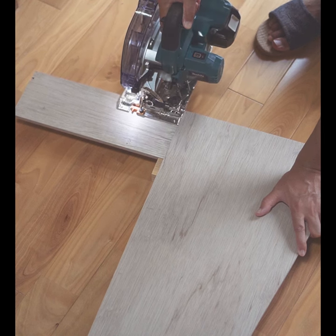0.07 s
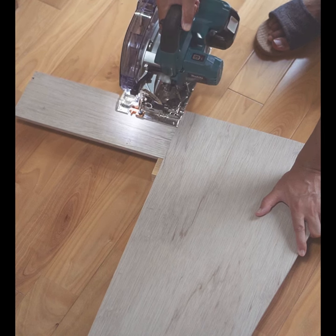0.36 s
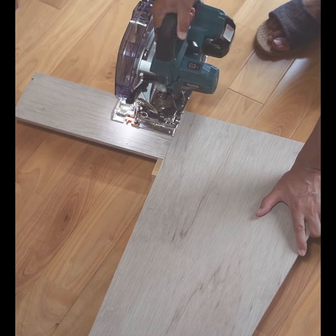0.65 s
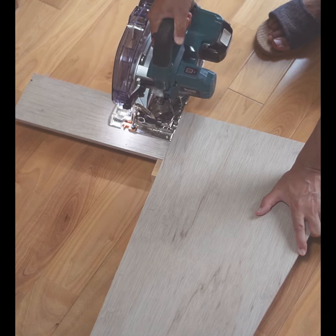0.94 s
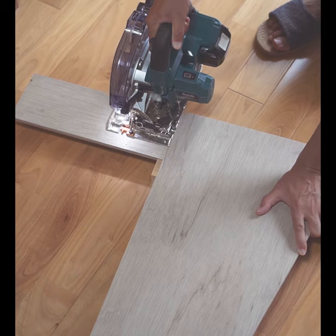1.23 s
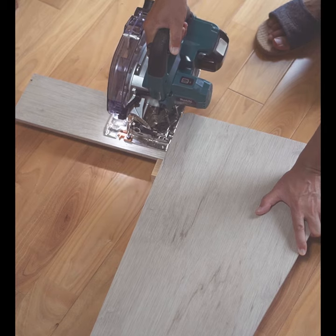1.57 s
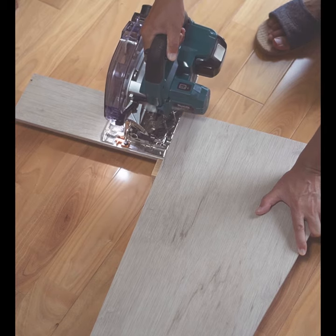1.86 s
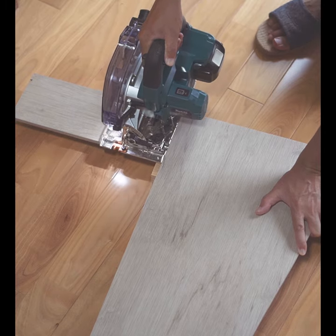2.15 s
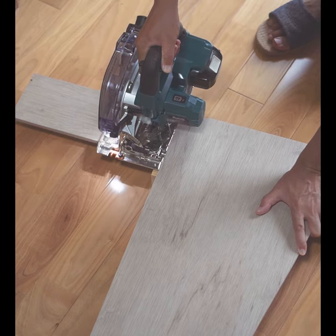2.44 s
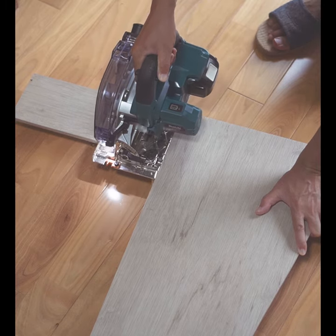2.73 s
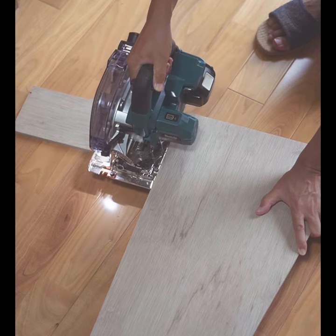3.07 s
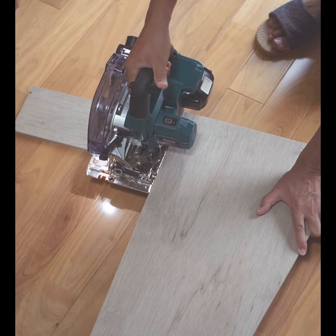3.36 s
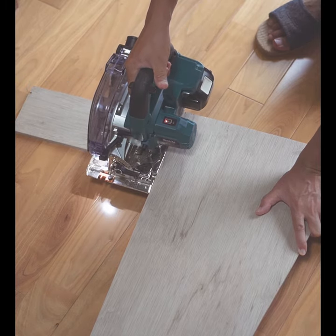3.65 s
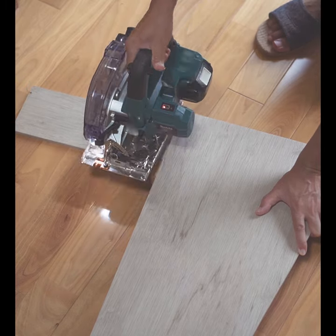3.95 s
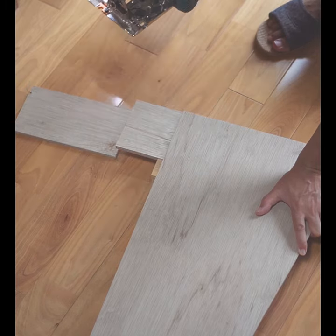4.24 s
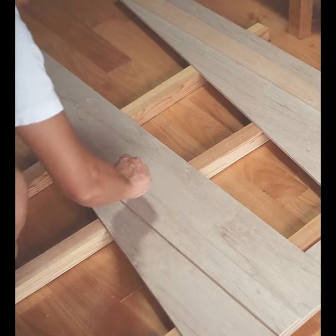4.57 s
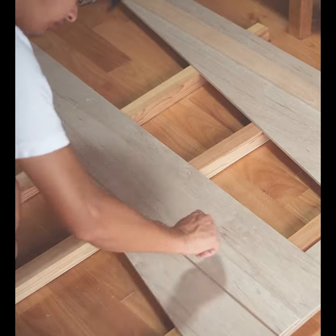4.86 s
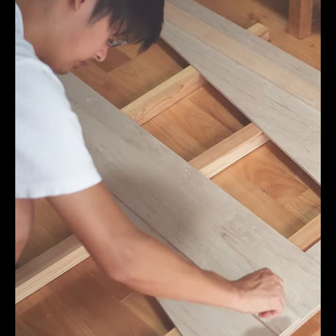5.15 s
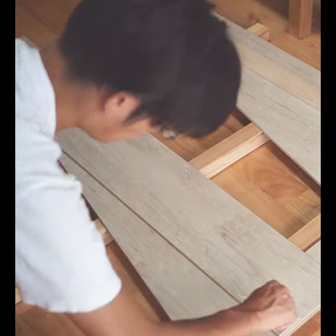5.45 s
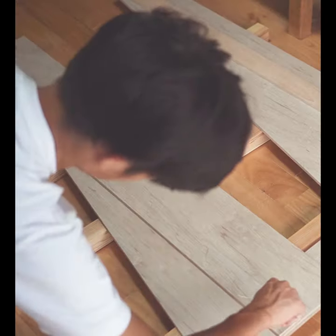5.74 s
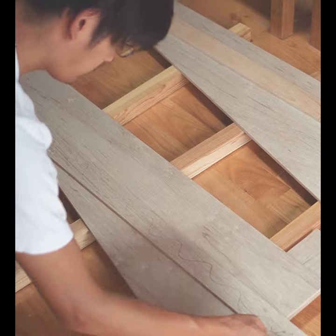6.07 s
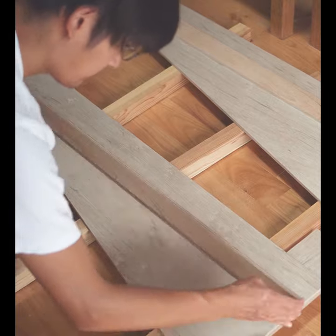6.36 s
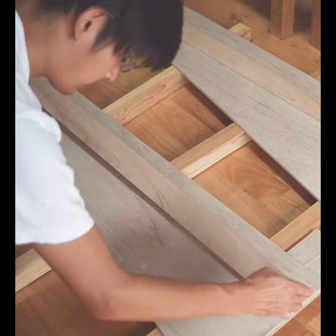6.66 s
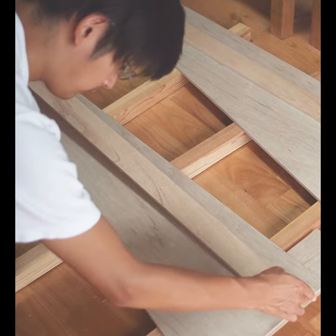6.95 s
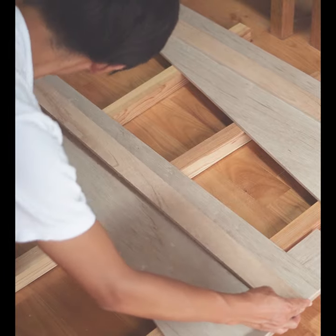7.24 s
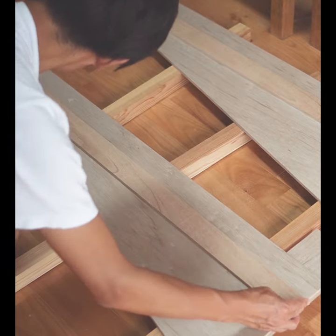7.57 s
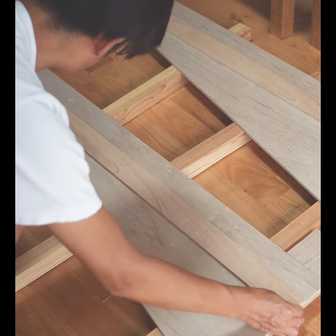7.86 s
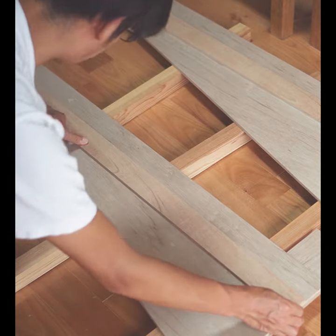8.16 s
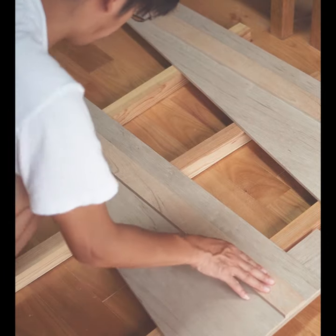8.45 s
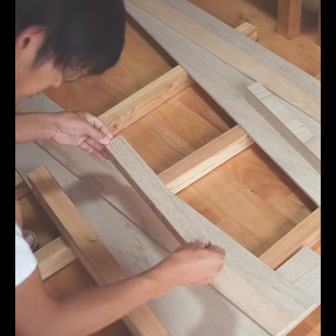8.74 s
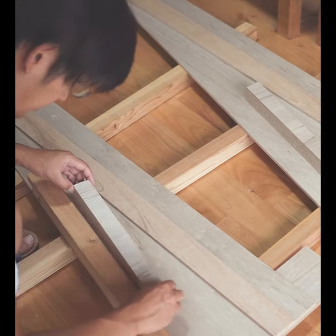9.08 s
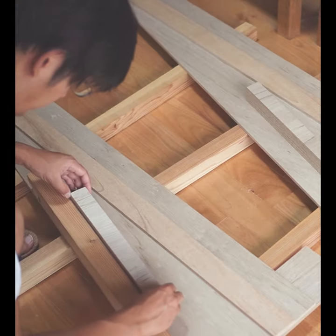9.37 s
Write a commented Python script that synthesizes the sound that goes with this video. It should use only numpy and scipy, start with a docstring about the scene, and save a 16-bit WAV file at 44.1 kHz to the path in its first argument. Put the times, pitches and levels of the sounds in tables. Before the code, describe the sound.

Heard close up indoors, a circular saw starts with metallic clacks and cuts through a plank for about three seconds, its motor dipping while the blade squeals. It stops quickly and the blade guard snaps closed. The background then changes to a steady hiss and low drone, over which a wooden floorboard scrapes, taps and clicks into place, ending with a firm thump and a brief brushing sound.

```python
"""In a quiet room a cordless circular saw clacks and spins up, its fan humming and its gears whining.
The teeth bite a floor plank, the motor sags and friction sets the steel disc squealing; then the saw
brakes and its blade guard snaps shut. Next, in a hissier room, a floorboard is rubbed along its
neighbour, ringing by stick-slip friction, slid into its groove and pressed down on the joists with
a thump. One close microphone hears it all."""
import sys
import numpy as np
from scipy import signal
from scipy.fft import rfft, irfft, next_fast_len
from scipy.io import wavfile

SR = 44100
rng = np.random.default_rng(int(sys.argv[2]) if len(sys.argv) > 2 else 0)


def generate_wav(sig):
    """Save sig (samples, or channels by samples) to the path in sys.argv[1] as 16-bit PCM at SR."""
    pcm = np.round(np.clip(np.atleast_2d(sig).T, -1, 1) * 32767).astype(np.int16)
    wavfile.write(sys.argv[1], SR, pcm)


N = 423801
TIME = np.arange(N) / SR
START_S, BRAKE_AT_S, BRAKE_S, STOP_S = .105, 3.32, .12, 3.36
ENTER_AT_S, ENTER_S, EXIT_AT_S = .68, .39, 3.0  # the blade sinks into the plank, then breaks through

# Spectra of rushing air, the board's body and scraped wood.
# Each row: frequency in Hz, relative density in dB.
AIR_SPECTRUM = [(60, -56), (220, -37), (400, -16.5), (650, -8.5), (1100, 2), (1700, 1), (2300, 5),
                (3000, 4.5), (4500, 1.5), (6100, 2.5), (7500, -2.5), (10000, -3.5), (16000, -12.5)]
BOARD_SPECTRUM = [(120, -38), (260, -22.5), (430, 4), (520, -10), (720, -0.5), (900, -10), (1200, 3),
                  (1480, 5), (1900, -1), (2250, -3), (2900, -16.5), (4600, -43), (8000, -51.5)]
SCRAPE_SPECTRUM = [(1470, -28.5), (2500, -9.5), (3030, -6.5), (3330, -4), (3730, -6), (7950, -9.5),
                   (12900, -15), (15800, -16.5)]
# Scuffs of the board. Each row: centre in seconds, half length in seconds, relative ring and hiss in dB.
BOARD_SCUFFS = [(4.477, .009, -21.5, -45.5), (4.783, .022, -21, -32.5), (4.837, 0.0053, -19.5, -34),
                (4.882, .014, -17, -43.5), (4.933, .016, -22.5, -32), (4.999, .016, -23, -41.5),
                (5.038, 0.01, -18.5, -26.5), (5.091, .014, -11, -29), (5.147, .014, -23.5, -30.5),
                (5.205, .017, -18, -38.5), (6.19, .012, -17, -20.5), (6.229, .023, -14.5, -17),
                (6.356, .011, -18.5, -18.5), (8.012, .016, -31.5, -38), (8.1, .045, -50, -36),
                (8.395, .012, -27, -44)]


def amp(db):
    """Decibels to gain."""
    return 10 ** (np.asarray(db) / 20)


def unit(x):
    """Scale to rms 1."""
    return x / np.sqrt(np.mean(x ** 2) + 1e-20)


def curves(rows):
    """One value per sample for each column after the time."""
    times, *columns = np.transpose(rows)
    return [np.interp(TIME, times, column) for column in columns]


def along(points, hz):
    """(Hz, value) points read on a log axis."""
    freqs, values = np.transpose(points)
    return np.interp(np.log(hz + 1), np.log(freqs + 1), values)


def ramp(s, length):
    """A rise from 0 to 1 that begins at time s."""
    return np.clip((TIME - s) / length, 0, 1)


def swell(s, half):
    """A Gaussian rise and fall around time s."""
    return np.exp(-.5 * np.minimum(((TIME - s) / half) ** 2, 100))


def noise(size=N):
    """White noise."""
    return rng.standard_normal(size)


def wobble(rate):
    """A random curve of rms 1 with rate knots a second."""
    knots = noise(int(N / SR * rate) + 2)
    return unit(np.interp(TIME * rate, np.arange(len(knots)), knots))


def filtered(x, response):
    """x through a frequency response."""
    size = next_fast_len(len(x) + 8192)
    return irfft(rfft(x, size) * response(np.fft.rfftfreq(size, 1 / SR)), size)[:len(x)]


def coloured(x, spectrum):
    """x shaped by a spectrum, at rms 1."""
    return unit(filtered(x, lambda hz: amp(along(spectrum, hz))))


def narrow(hz, width_hz):
    """Noise in one resonance, at rms 1."""
    return unit(filtered(noise(), lambda f: 1 / (1 + ((f - hz) / width_hz) ** 2)))


def add(track, s, sound):
    """Mix a sound in at time s."""
    part = track[max(round(s * SR), 0):][:len(sound)]
    part += sound[:len(part)]


def ring(modes, scatter_db, size=SR):
    """Free decay of (Hz, dB, t60) modes after one blow, their strengths scattered."""
    t = np.arange(size) / SR
    return sum(amp(db + scatter_db * rng.standard_normal() - 60 * t / t60) * np.sin(2 * np.pi * hz * t)
               for hz, db, t60 in modes)


def partials(turns, orders, waver_db, jitter_rad):
    """Harmonics of a shaft's rotation, randomly modulated in level and phase."""
    return sum(amp(db + waver_db * wobble(12)) * np.sqrt(2)
               * np.sin(2 * np.pi * (k * turns + rng.random()) + jitter_rad * wobble(130))
               for k, db in orders)


def reverberant(x, wet_db):
    """Reverberation: a small wooden room adds a short tail whose treble is absorbed first."""
    # Room decay. Each row: frequency in Hz, t60 in seconds.
    walls = [(200, 0.23), (2000, 0.19), (8000, 0.16), (15000, 0.089)]
    hz, t, spectra = signal.stft(noise(SR // 2), SR, nperseg=256)
    tail = signal.istft(spectra * amp(-60 * t / along(walls, hz)[:, None]), SR, nperseg=256)[1]
    delayed_tail = np.pad(tail, (130, 0)) / np.linalg.norm(tail)
    return x + amp(wet_db) * signal.fftconvolve(x, delayed_tail)[:N]


def quiet_room():
    """Stationary noise: a faint broadband floor with a narrowband hum."""
    # Each row: frequency in Hz, relative density in dB.
    floor = [(15, -45.5), (25, -14), (37, -28), (113, -14), (184, -13), (241, -25.5), (276, -10.5),
             (324, -21.5), (1250, -22.5), (7830, -41.5), (12400, -29.5), (13800, -55.5), (15800, -45.5)]
    return amp(-59) * coloured(noise(), floor) + amp(-67) * narrow(179, width_hz=2)


def clacks():
    """Impact noise: gear, brake and guard strike in sharp bursts that also knock on the plank."""
    # Each row: start in seconds, metal level in dB, t60 in seconds, knock level in dB.
    strikes = [(.002, -41, 0.42, -32), (.104, -8.5, .06, -19), (0.13, -11.5, 0.07, -14.5),
               (.15, -13.5, .06, -25), (3.325, -12.5, .1, -29), (3.353, -18.5, .11, -26),
               (4.041, -9.5, 0.079, -28.5), (4.047, -12.5, 0.056, -37), (4.056, -17.5, 0.14, -44),
               (4.077, -21, 0.14, -44)]
    # The metal, and the saw's base on the plank. Each row: frequency in Hz, relative density in dB.
    metal = [(120, -65), (200, -40), (379, -22), (633, -30.5), (774, -17.5), (1360, -19.5), (2150, 1.5),
             (2450, -8), (3160, -3.5), (5680, -14.5), (7470, -13.5), (8180, -19), (15800, -31)]
    base = [(50, -25.5), (140, -2.5), (250, -12.5), (600, -4.5), (1050, 0.5), (1600, -8.5), (5000, -13),
            (16000, -27)]
    out, t = np.zeros(N), TIME[:SR // 2]
    for s, db, t60, knock_db in strikes:
        burst = amp(db) * coloured(noise(len(t)), metal) + amp(knock_db) * coloured(noise(len(t)), base)
        add(out, s, burst * amp(-60 * t / t60) * (1 - np.exp(-t / .001)))
    return reverberant(out, wet_db=-6)


def handling():
    """Friction and impact: base and guard squeak, the guard slides round, the saw bumps the plank."""
    # Each row: centre in seconds, half length in seconds, pitch in Hz, level in dB.
    squeaks = [(.01, 0.043, 10240, -25.5), (0.013, 0.044, 3470, -36.5), (3.662, 0.028, 9300, -61),
               (3.981, 0.014, 1070, -38), (3.992, 0.021, 4270, -47), (4.196, .04, 9440, -62)]
    # Each row: start in seconds, relative level in dB.
    bumps = [(.002, -34), (0.101, -34), (3.40, -43), (3.955, -37), (4.019, -33)]
    out = sum(amp(db) * swell(s, half) * narrow(hz, .055 * hz) for s, half, hz, db in squeaks)
    guard_slide = amp(-38) * swell(4.015, .017) * coloured(noise() * amp(3 * wobble(300)), AIR_SPECTRUM)
    soft_onset = 1 - np.exp(-TIME[:SR] / .012)
    for s, db in bumps:
        add(out, s, amp(db) * ring([(125, 5, .16), (165, -3, .1)], scatter_db=1) * soft_onset)
    return out + guard_slide


def engagement():
    """Fractions from 0 to 1: the blade has entered, its teeth are cutting, its disc is buried."""
    entered = ramp(ENTER_AT_S, ENTER_S)
    cutting = entered * (1 - ramp(EXIT_AT_S, .1))
    return entered, cutting, cutting * ramp(ENTER_AT_S, 1.5)


def load_db(free_db, cutting_db, buried_db):
    """A free-running level plus what cutting and burying the disc each add."""
    _, cutting, buried = engagement()
    return free_db + cutting_db * cutting + buried_db * buried


def fan(motor_turns, speed):
    """Resonance: the housing favours some pitches of the fan, which is muffled over the plank."""
    # Each row: rotation rate in Hz, gain in dB.
    housing = [(300, -45), (500, -33.5), (645, -27), (677, -17), (706, -29.5), (724, -31), (731, -37),
               (742, -26), (751, -29), (765, -24.5), (775, -24.5)]
    # Each row: multiple of the motor speed, relative level in dB.
    orders = [(1, 1.5), (2, -8.5), (3, -8.5)]
    entered, _, _ = engagement()
    level_db = along(housing, speed) - 1.95 * entered
    return amp(level_db) * partials(motor_turns, orders, waver_db=2, jitter_rad=.05)


def gear_whine(motor_turns, speed):
    """Gear meshing: a whine, stronger in run-up and under effort, smeared by backlash when unloaded."""
    # Each row: multiple of the motor speed, relative level in dB.
    orders = [(4, -13.5), (8, 1.5), (9, -2.5), (16, -12)]
    free_hz, full_sag_hz = 783, 60
    entered, cutting, _ = engagement()
    effort = np.clip((free_hz - speed) / full_sag_hz, 0, 1)
    level_db = -34.5 + 6.5 * effort + 7 * (1 - entered)
    slack = .77 * (1 - cutting)
    chatter = (1 + .6 * slack * wobble(600)) / np.hypot(1, .6 * slack)
    whine = partials(motor_turns, orders, waver_db=2.5, jitter_rad=.2 + .67 * slack)
    return amp(level_db) * chatter * whine


def tooth_bite(blade_turns, drive):
    """Periodic impacts: the teeth sound the 21st harmonic, with sidebands as no two bite alike."""
    # The bite, and the screech of the buried teeth.
    # Each row: multiple of the blade speed, relative level in dB.
    bite_orders = [(3, -30), (8, -19.5), (17, -22), (19, -12), (20, -3.5), (21, 1.5), (22, -3), (23, -5),
                   (24, -10), (25, -14.5), (26, -10), (29, -15), (33, -19), (41, -12), (42, -10), (47, -8),
                   (55, -13), (59, -13.5), (60, -7), (71, -14), (83, -15.5), (84, -13.5)]
    screech_orders = [(21, -3)]
    _, _, buried = engagement()
    level_db = load_db(-34, 12.5, -2.7) + 1.3 * wobble(7.03)  # an uneven push makes it surge
    bite = partials(blade_turns, bite_orders, waver_db=3, jitter_rad=.11)
    screech = buried * partials(blade_turns, screech_orders, waver_db=3.5, jitter_rad=.14)
    # the same rasp repeats on every turn: a fine comb of weak lines
    rasp = np.interp(blade_turns % 1, np.arange(256) / 256, noise(256), period=1)
    return amp(level_db) * (drive * (bite + screech) + amp(-13) * coloured(rasp, AIR_SPECTRUM))


def disc_squeal(blade_turns, speed, drive):
    """Friction in the kerf excites high harmonics and one disc mode that keeps its own pitch."""
    # Each row: multiple of the blade speed, relative level in dB.
    orders = [(45, -13), (53, -10.5), (57, -12), (61, -13), (62, -14), (63, 3.5), (64, -14), (65, -22),
              (67, -9.5), (72, -23), (76, -21)]
    best_speed_hz = 728.4  # the disc squeals most readily at this motor speed
    detuning = np.minimum(np.abs(speed - best_speed_hz) / 20, 1)
    harmonics = drive * partials(blade_turns, orders, waver_db=2.5, jitter_rad=.1)
    mode = amp(-.5) * narrow(8220, width_hz=45)
    return amp(load_db(-46, 6.5, 17) - 4.5 * detuning) * (harmonics + mode)


def disc_song():
    """Natural modes: the disc sings before and after the cut, and chirps on entry and mid-cut."""
    before = swell(.5, .3) * (amp(-31) * narrow(2860, 45) + amp(-27) * narrow(2200, 60))
    chirps = swell(.8, .058) * amp(-18) * narrow(2860, 15)
    chirps += swell(2.09, .026) * amp(-24) * narrow(4010, 12)
    after = swell(3.17, .18) * (amp(-21.5) * narrow(2830, 40) + amp(-23) * narrow(8250, 70))
    return before + chirps + after


def air_and_dust(puffs, entry):
    """Modulated noise: the wood muffles the puffs of air; crossing its edges throws more dust."""
    # Each row: frequency in Hz, relative density in dB.
    dust_spectrum = [(2000, -40), (6000, -4.5), (8400, 1), (9500, -1), (11500, -3.5), (13000, -10.5),
                     (16000, -5)]
    air_db = load_db(-18.5, -2.5, -3) + .65 * wobble(9)
    edges = .5 * entry + swell(EXIT_AT_S, .13)
    dust_db = load_db(-27, 4.5, -2) + 5.5 * edges + .8 * wobble(9)
    air = coloured(noise() * puffs * amp(1.9 * wobble(900)), AIR_SPECTRUM)
    dust = coloured(noise() * puffs * amp(3 * wobble(1500)), dust_spectrum)
    return amp(air_db) * air + amp(dust_db) * dust


def plank_rumble(blade_turns, puffs, entry):
    """Forced vibration: the plank thrums with each turn and shudders when the blade catches it."""
    # Each row: centre in seconds, half length in seconds, level in dB.
    shudders = [(0.418, 0.047, -40), (.7, 0.15, -43), (2.13, 0.04, -42.5), (3.098, .033, -31.5),
                (3.35, .025, -35)]
    # Each row: frequency in Hz, relative density in dB.
    plank = [(100, -30.5), (200, -19.5), (290, -3.5), (420, 6.5), (560, -3), (900, -17)]
    shaking = amp(-69) + sum(amp(db) * swell(s, half) for s, half, db in shudders)
    thrum_db = load_db(-55, 1.5, 10) + 15 * entry + 1.5 * wobble(14)
    thrum = amp(thrum_db) * unit(np.sin(2 * np.pi * blade_turns))
    return shaking * coloured(noise() * puffs, plank) + thrum


def disc_ring(running):
    """Light damping: the shaken steel rings on after the brake, which jolts its lowest modes."""
    # Each row: frequency in Hz, relative level in dB, t60 in seconds.
    modes = [(623, -31.5, 1.3), (1954, -26.5, 1.2), (2840, 16.5, 0.2), (3005, -9.5, 0.45), (3830, -23, .28),
             (3840, -6, .34), (7100, -19.5, 0.47), (8240, 12.5, 0.25)]
    out = amp(-32) * unit(signal.fftconvolve(noise() * running, ring(modes, scatter_db=0))[:N])
    add(out, STOP_S, ring([(1954, -30, .5), (624, -56, 1)], scatter_db=0))
    return out


def saw():
    """Rotating machinery: fan, gears and blade follow one motor speed, which sags in the cut."""
    # Motor speed between spin-up and brake. Each row: time in seconds, turns a second.
    motor_speed = [(0.105, 660), (0.3, 672), (0.49, 707), (0.6, 746.5), (0.7, 770.5), (0.78, 764),
                   (0.94, 741), (1.24, 737), (1.38, 743.5), (1.8, 736.5), (2.0, 728), (2.1, 743.5),
                   (2.22, 726.5), (2.6, 724.5), (2.78, 708), (2.99, 707), (3.2, 775), (3.32, 770.5)]
    spin_up_s, gear_ratio = .041, .1865
    spin_up = 1 - np.exp(-np.maximum(TIME - START_S, 0) / spin_up_s)
    braking = ramp(BRAKE_AT_S, BRAKE_S)
    speed = curves(motor_speed)[0] * spin_up * (1 - braking ** 2)
    motor_turns = np.cumsum(speed * (1 + .00058 * wobble(30))) / SR
    blade_turns = gear_ratio * motor_turns
    running = ramp(START_S, .0033) * amp(-60 * np.maximum(TIME - STOP_S, 0) / .1)
    # driven tones are weak at low speed and die with the power
    drive = np.minimum(speed / 500, 1) * amp(-60 * braking)
    puffs = 1 + .23 * np.cos(2 * np.pi * blade_turns)
    entry = swell(ENTER_AT_S + .49 * ENTER_S, .13)  # crossing the plank's first edge
    tones = drive * (fan(motor_turns, speed) + gear_whine(motor_turns, speed))
    tones += tooth_bite(blade_turns, drive) + disc_squeal(blade_turns, speed, drive) + disc_song()
    rush = reverberant(running * air_and_dust(puffs, entry), wet_db=-5)
    return running * (tones + plank_rumble(blade_turns, puffs, entry)) + rush + disc_ring(running)


def hissy_room():
    """Broadband hiss lies over the low, wavering drone of narrow room resonances."""
    # Each row: time in seconds, hiss level in dB, drone level in dB.
    levels = [(4.43, -35, -43.5), (5.3, -36, -38), (6.5, -36.5, -42), (8.6, -35.5, -42.5),
              (8.76, -41.5, -45.5), (9.6, -42, -49)]
    # Each row: frequency in Hz, relative level in dB.
    resonances = [(179, 4), (268, 3.5)]
    hiss_spectrum = [(15, -38), (25, -8), (107, -11.5), (170, -12.5), (216, -15), (261, 0.5), (324, -15),
                     (403, -9), (557, -16.5), (637, -14), (1150, -19), (3880, -17), (15800, -26)]
    hiss_db, drone_db = curves(levels)
    drone = unit(sum(amp(db) * narrow(hz, width_hz=13) for hz, db in resonances))
    return amp(hiss_db + .25 * wobble(4.7)) * coloured(noise(), hiss_spectrum) + amp(drone_db) * drone


def rubbing():
    """Stick-slip friction: tiny slips ring the board's bending modes and its thin tongue."""
    # A hand wipes the seam, hard and then lightly. Each row: time in seconds, relative level in dB.
    strokes = [(4.43, -33), (4.55, -31), (4.72, -32), (4.95, -31.5), (5.22, -34.5), (5.3, -55), (5.5, -37),
               (5.8, -42.5), (5.95, -61)]
    # Each row: frequency in Hz, relative level in dB.
    bending_modes = [(1290, -7.5), (1460, 4.5), (1600, -4.5), (1760, -9), (2250, -7.5), (2880, -23)]
    tongue_modes = [(2900, 4), (3800, -3), (6000, -16)]
    wipe = amp(curves(strokes)[0] + 2 * wobble(35))
    body_power, hiss_power = wipe ** 2, (amp(-9.5) * wipe) ** 2
    for s, half, ring_db, hiss_db in BOARD_SCUFFS:
        body_power += (amp(ring_db) * swell(s, half)) ** 2
        hiss_power += (amp(hiss_db) * swell(s, half)) ** 2
    slips = noise() * amp(2.1 * wobble(700))
    # the moving contact favours now one mode, now another
    bending = unit(sum(amp(db + 5.1 * wobble(29)) * narrow(hz, width_hz=35) for hz, db in bending_modes))
    tongue = unit(sum(amp(db) * narrow(hz, width_hz=70) for hz, db in tongue_modes))
    body = amp(-4) * coloured(slips, BOARD_SPECTRUM) + amp(-2.8) * bending
    hiss = amp(-.5) * coloured(slips, SCRAPE_SPECTRUM) + amp(-6.5) * tongue
    return np.sqrt(body_power) * body + np.sqrt(hiss_power) * hiss


def thud(centre_hz):
    """Modal response: how the board lands on its joists favours the modes around one pitch."""
    # Each row: frequency in Hz, relative level in dB, t60 in seconds.
    joist_modes = [(100, -15, 0.13), (188.4, -7, 0.16), (231, -18, 0.24), (271, 0.5, 0.076),
                   (326, -3.5, 0.04), (407, -6, 0.068), (564, -1.5, 0.042), (701, -2, 0.059)]
    t = TIME[:SR // 2]
    modes = [(hz, db - 12 * np.log2(hz / centre_hz) ** 2, t60) for hz, db, t60 in joist_modes]
    return amp(2.5) * ring(modes, scatter_db=1, size=len(t)) * (1 - np.exp(-t / .003))


def click():
    """A brief contact gives a broad spectrum: the board's edge taps its neighbour."""
    t = TIME[:SR // 2]
    body = amp(2) * coloured(noise(len(t)), BOARD_SPECTRUM)
    surface = amp(-2.5) * coloured(noise(len(t)), SCRAPE_SPECTRUM)
    return (body + surface) * amp(-60 * t / .07) * (1 - np.exp(-t / .0015))


def knocks():
    """Impact and rebound: scuffs push the board onto its joists; knocks land twice."""
    # Each row: start in seconds, relative thud level in dB, thud centre in Hz, relative click in dB.
    landings = [(4.985, -16, 520, -41.5), (5.174, -14, 195, -42.5), (5.208, -9.5, 199, -27),
                (5.857, -21.5, 240, -28), (5.908, -18, 260, -16.5), (6.167, -19, 400, -35.5),
                (6.295, -21, 230, -47.5), (6.34, -21, 326, -15), (6.815, -20.5, 267, -32),
                (7.646, -24, 262, -31), (8.268, -28, 280, -32), (8.34, -22, 240, -35.5),
                (8.382, -4.5, 288, -31), (9.495, -30, 262, -52.5)]
    out = np.zeros(N)
    for s, _, ring_db, _ in BOARD_SCUFFS:
        add(out, s, amp(ring_db - 3.5) * thud(centre_hz=440))
    for s, thud_db, centre_hz, click_db in landings:
        add(out, s, amp(thud_db) * thud(centre_hz) + amp(click_db) * click())
        add(out, s + .017, amp(thud_db - 11.5) * thud(2.7 * centre_hz))  # rebound: weaker and higher
    return out


def rocking(count, from_s, to_s):
    """Random light impacts: the board rocks while it is lined up."""
    out = np.zeros(N)
    for when, strength in rng.random((count, 2)):
        knock = thud(centre_hz=250) + amp(-14.5) * click()
        add(out, from_s + when * (to_s - from_s), amp(-35 + 6 * strength) * knock)
    return out


def swishes():
    """Short swells of broadband noise: an airy brushing sound, then a brief bright rush of noise."""
    # Each row: centre in seconds, half length in seconds, level in dB.
    swells = [(8.11, .042, -34), (8.645, 0.006, -25), (8.673, 0.025, -25.5)]
    # Each row: frequency in Hz, relative density in dB.
    spectrum = [(300, -6.5), (1000, 0), (2000, -5.5), (3300, -2), (5000, -6.5), (7500, -2), (10000, -3),
                (13000, 2.5), (15800, -2)]
    return sum(amp(db) * swell(s, half) for s, half, db in swells) * coloured(noise(), spectrum)


def scene():
    """Superposition: sawing in the quiet room, then laying the board in the hissier one."""
    second_room_s = 4.431
    sawing = quiet_room() + clacks() + handling() + saw()
    board = rubbing() + knocks() + rocking(count=8, from_s=5.3, to_s=8.2)
    laying = hissy_room() + reverberant(board, wet_db=-6.5) + swishes()
    mono = np.where(TIME < second_room_s, sawing, laying)
    return np.array([mono, mono])


def record(dry):
    """Clipping and band limiting: peaks stop at full scale, then the highest treble is removed."""
    top_hz = 15830
    return np.array([filtered(channel, lambda hz: hz < top_hz) for channel in np.clip(dry, -1, 1)])


dry = scene()
out = record(dry)
generate_wav(out)
```